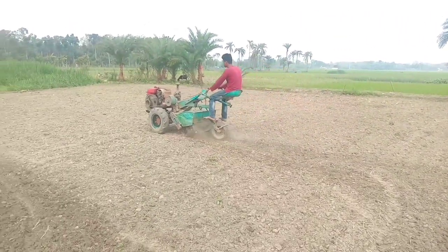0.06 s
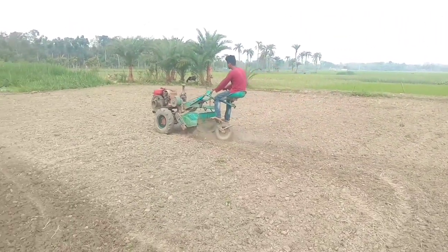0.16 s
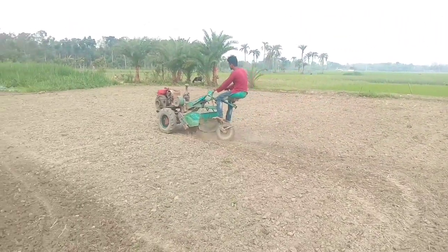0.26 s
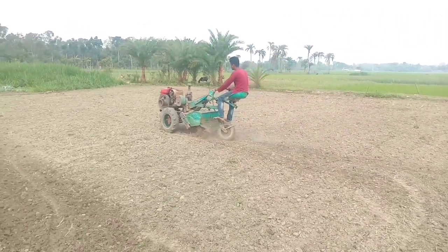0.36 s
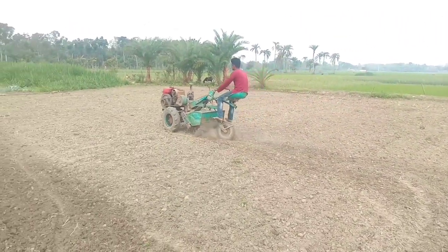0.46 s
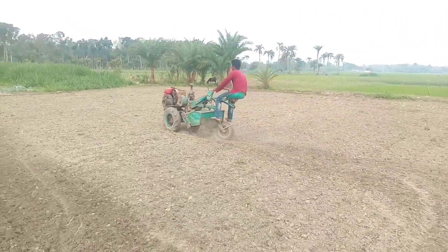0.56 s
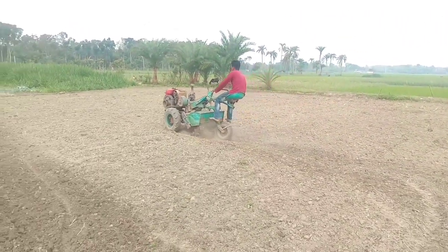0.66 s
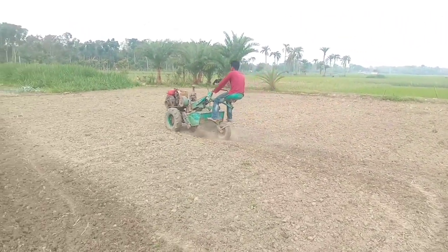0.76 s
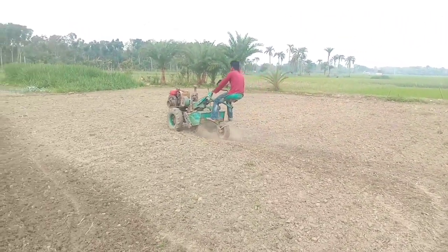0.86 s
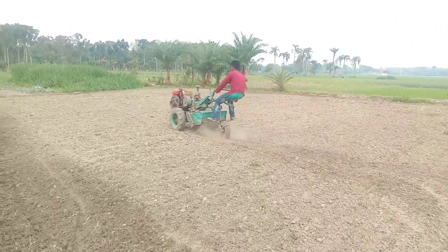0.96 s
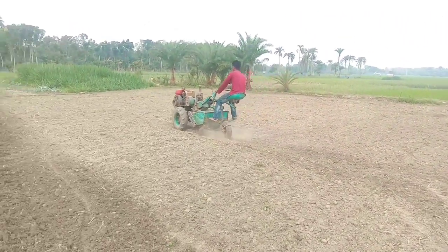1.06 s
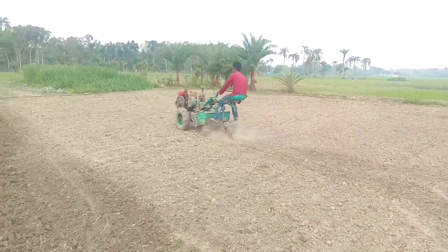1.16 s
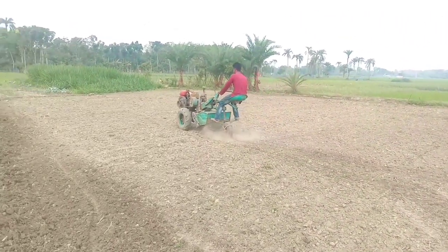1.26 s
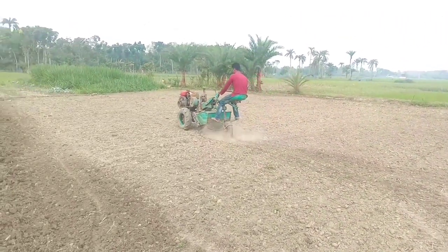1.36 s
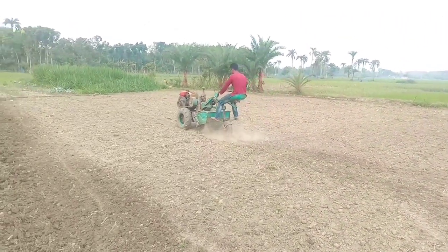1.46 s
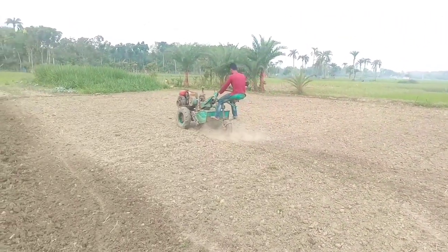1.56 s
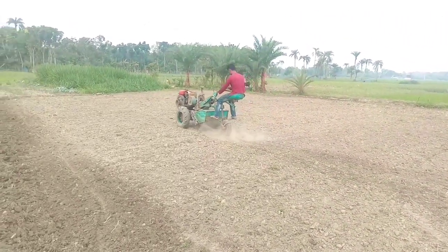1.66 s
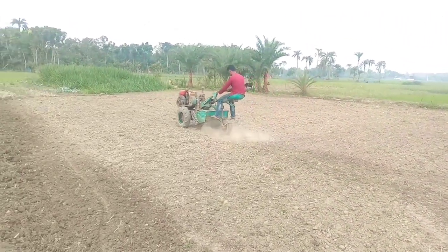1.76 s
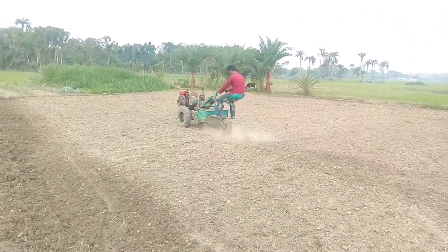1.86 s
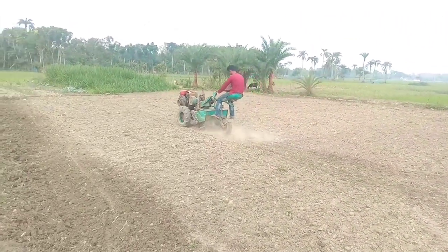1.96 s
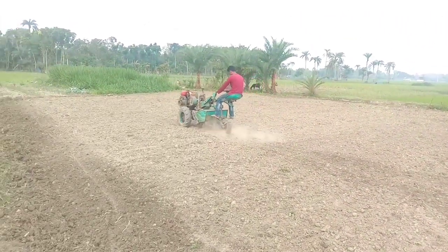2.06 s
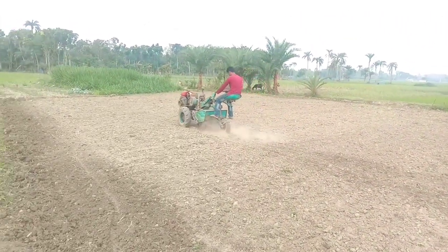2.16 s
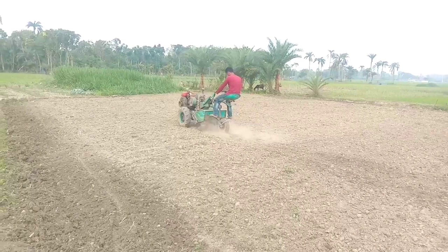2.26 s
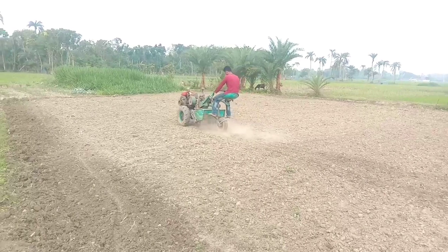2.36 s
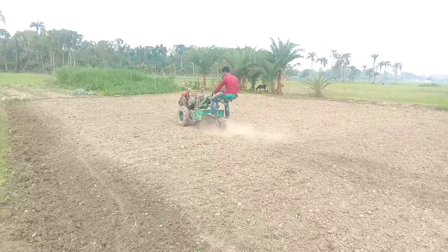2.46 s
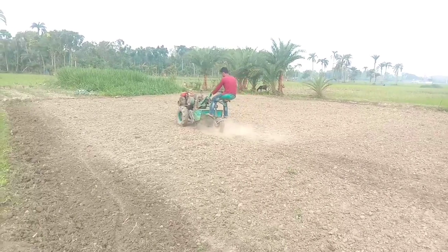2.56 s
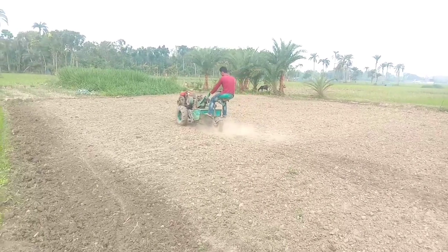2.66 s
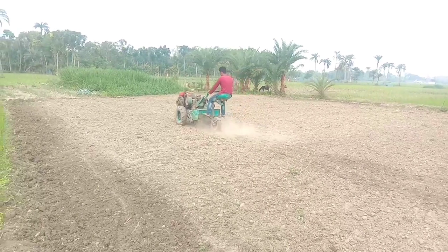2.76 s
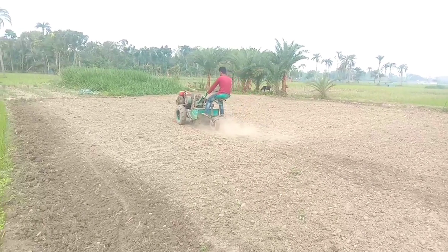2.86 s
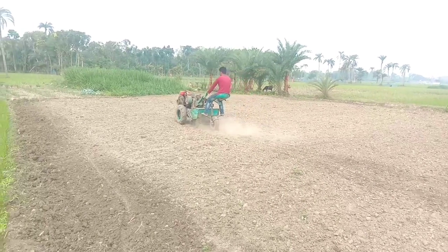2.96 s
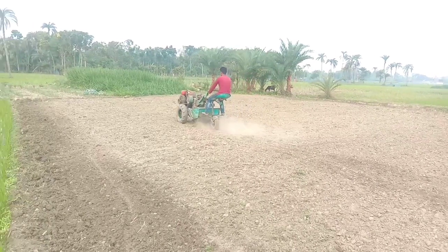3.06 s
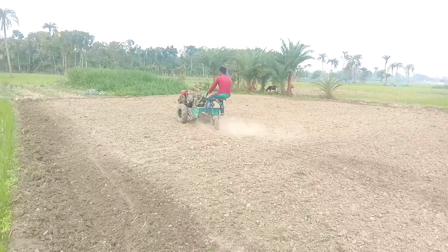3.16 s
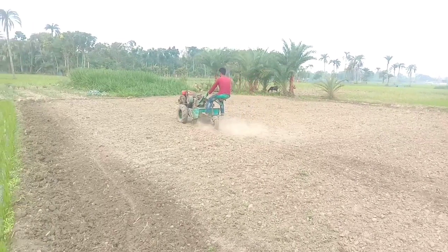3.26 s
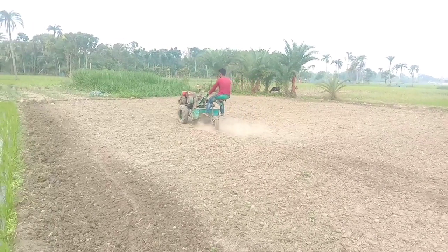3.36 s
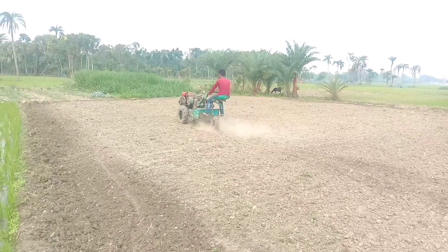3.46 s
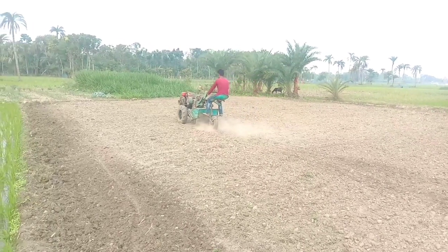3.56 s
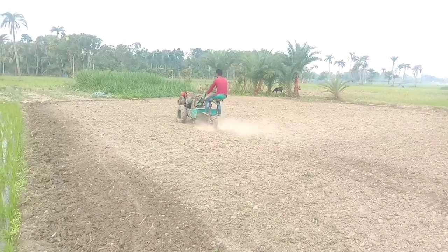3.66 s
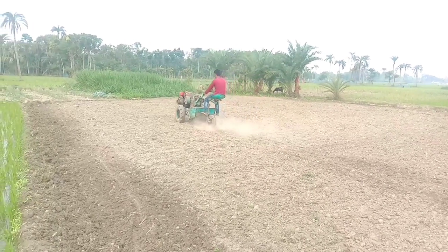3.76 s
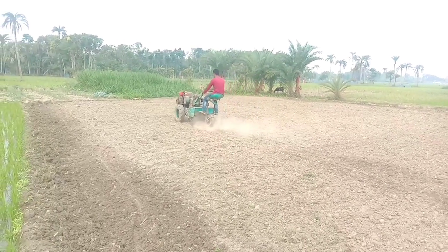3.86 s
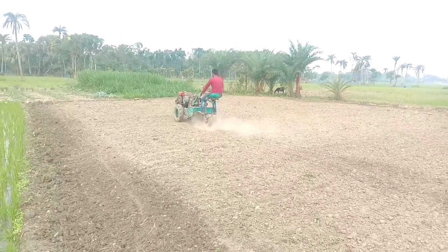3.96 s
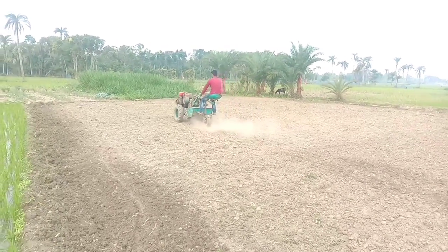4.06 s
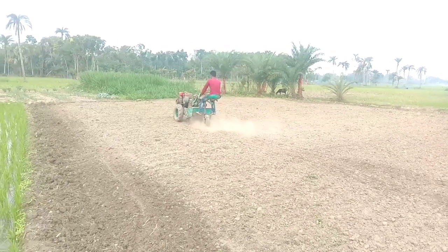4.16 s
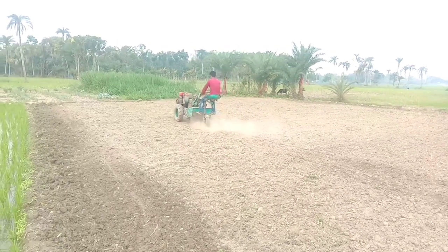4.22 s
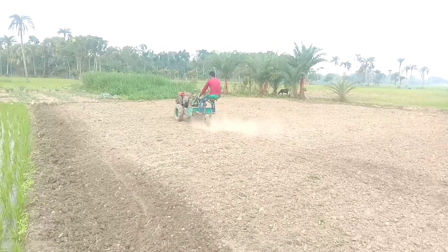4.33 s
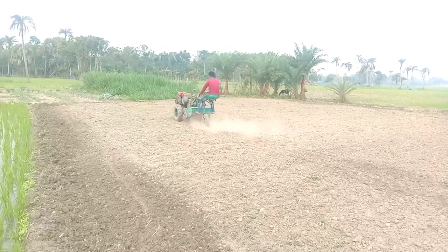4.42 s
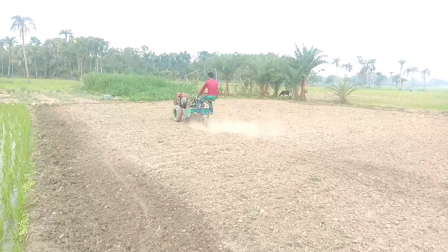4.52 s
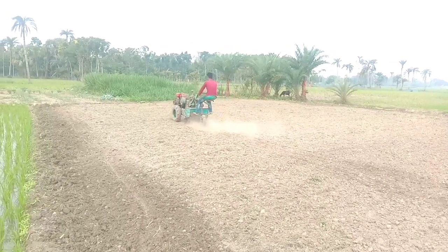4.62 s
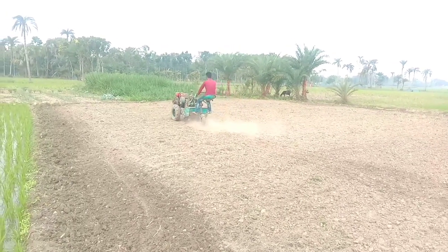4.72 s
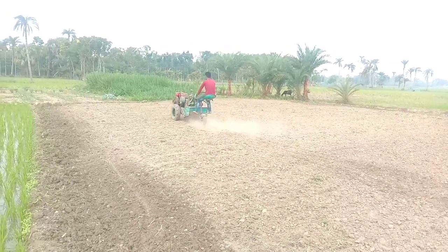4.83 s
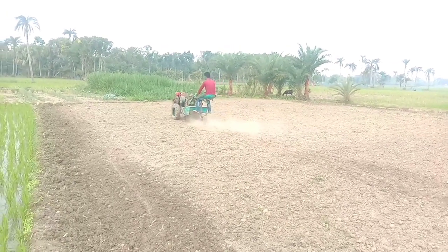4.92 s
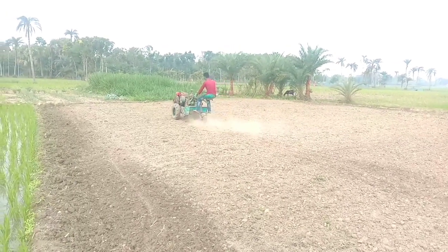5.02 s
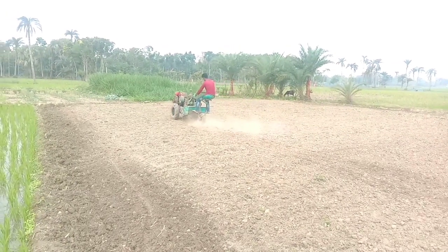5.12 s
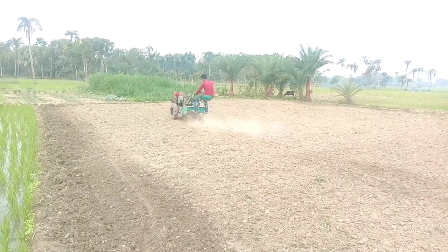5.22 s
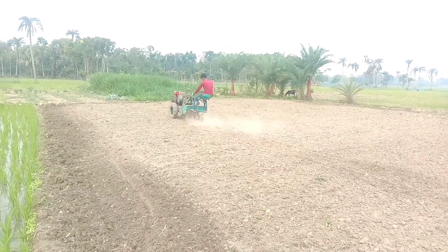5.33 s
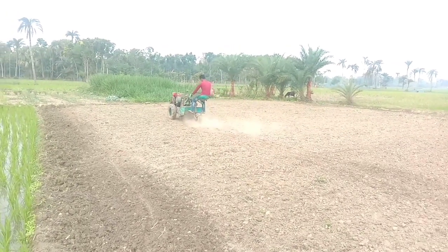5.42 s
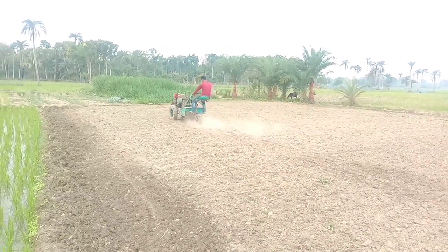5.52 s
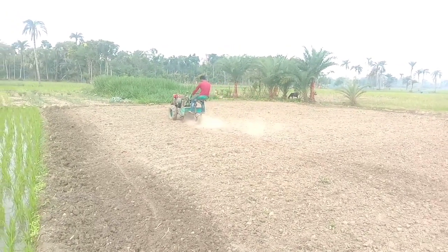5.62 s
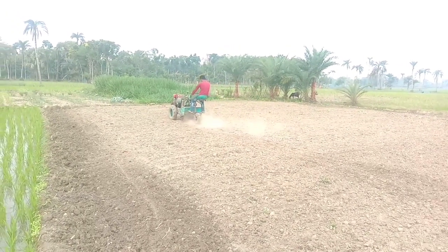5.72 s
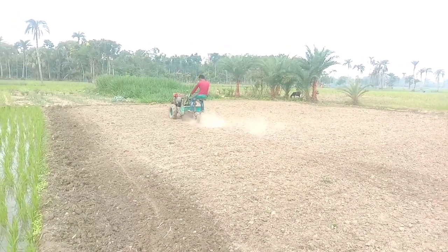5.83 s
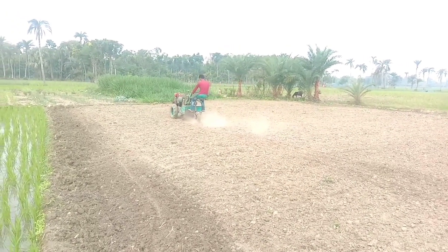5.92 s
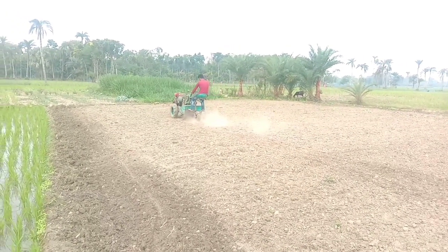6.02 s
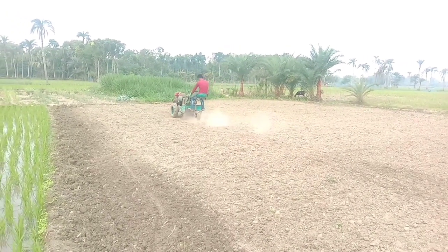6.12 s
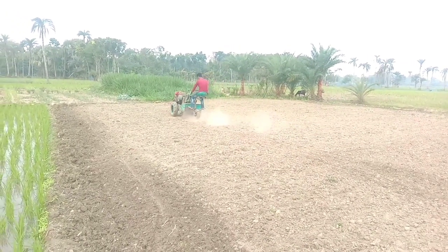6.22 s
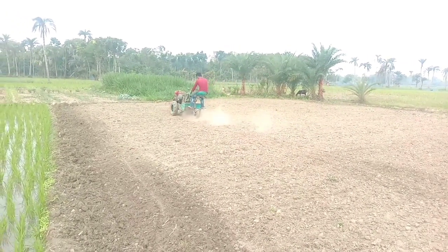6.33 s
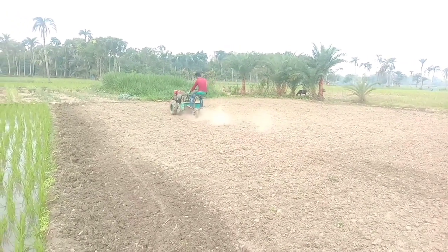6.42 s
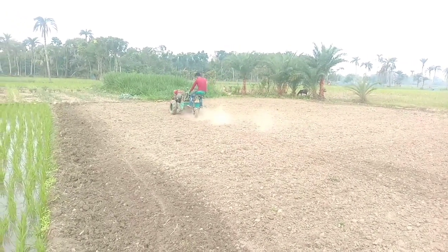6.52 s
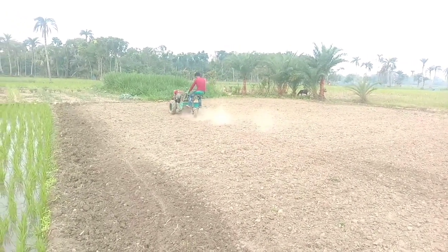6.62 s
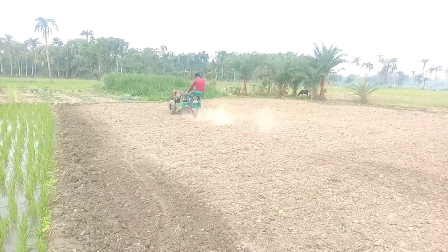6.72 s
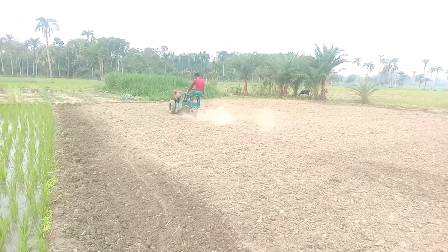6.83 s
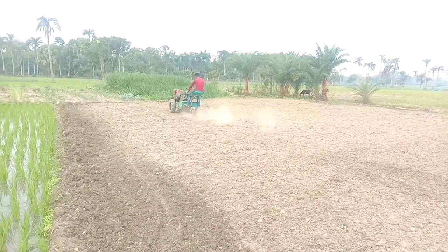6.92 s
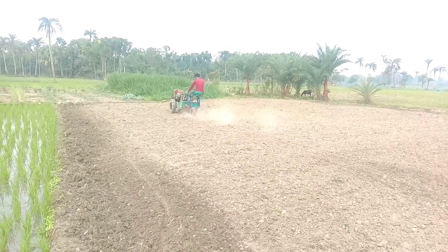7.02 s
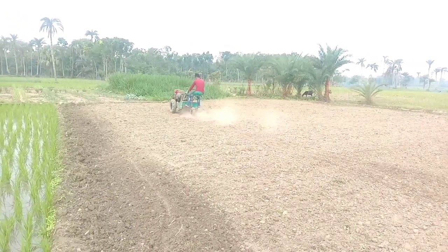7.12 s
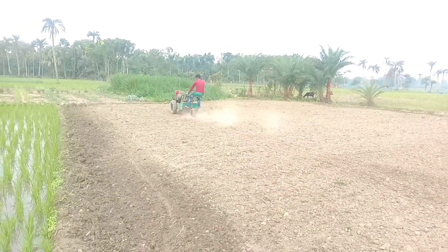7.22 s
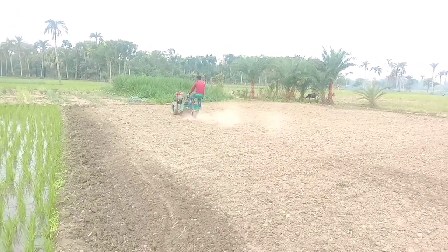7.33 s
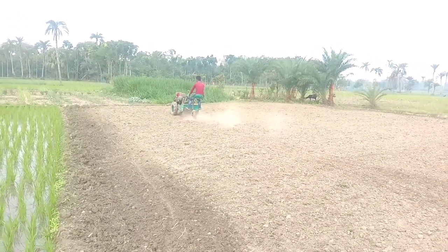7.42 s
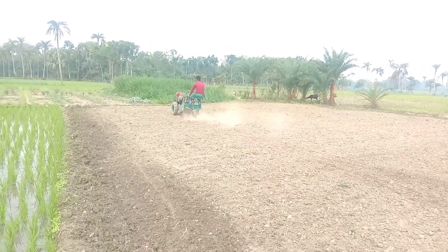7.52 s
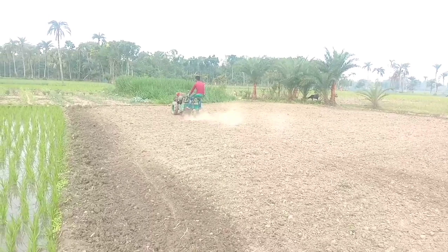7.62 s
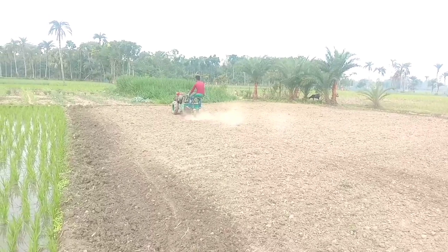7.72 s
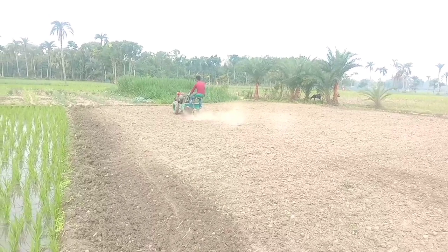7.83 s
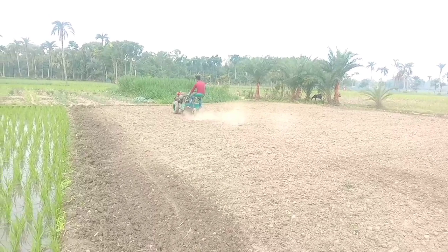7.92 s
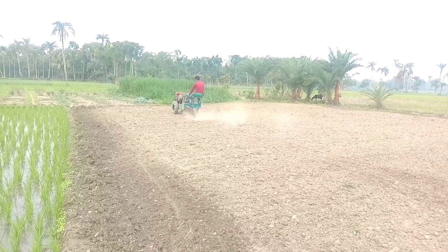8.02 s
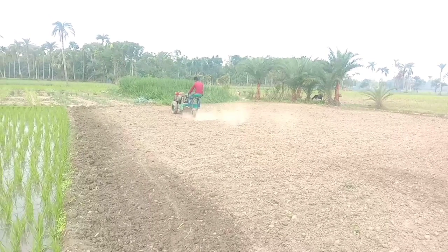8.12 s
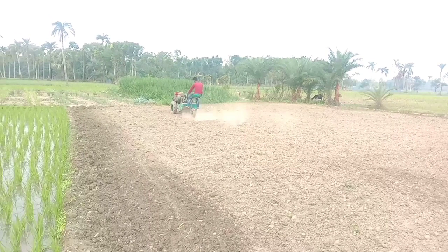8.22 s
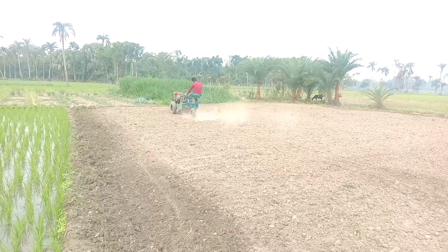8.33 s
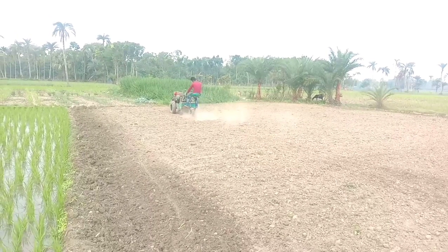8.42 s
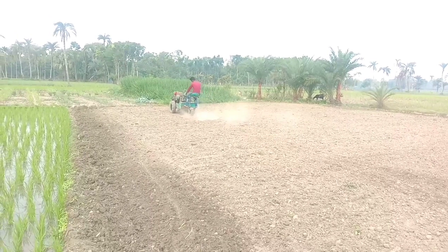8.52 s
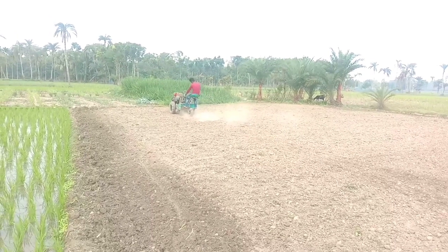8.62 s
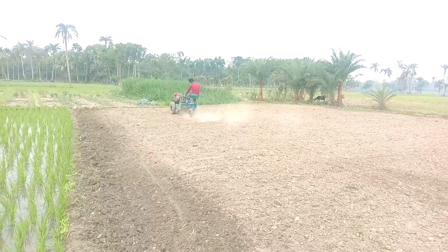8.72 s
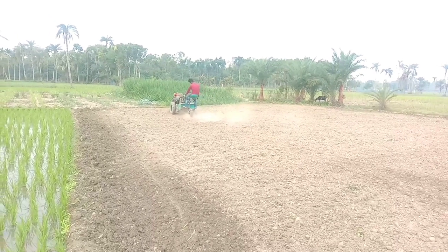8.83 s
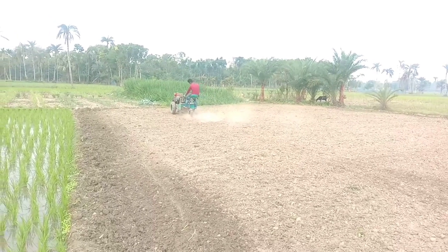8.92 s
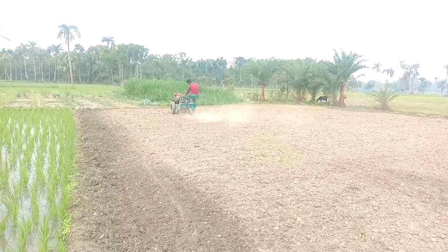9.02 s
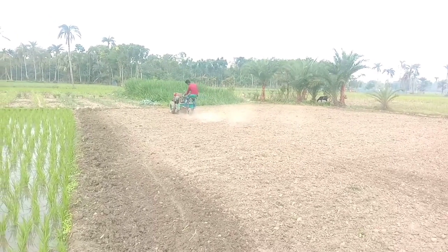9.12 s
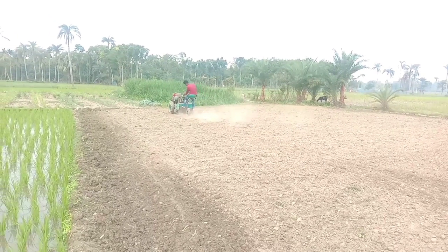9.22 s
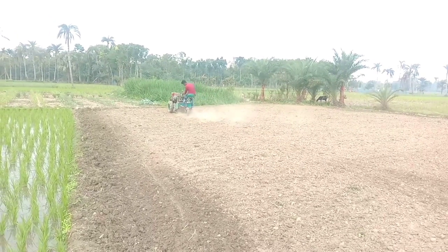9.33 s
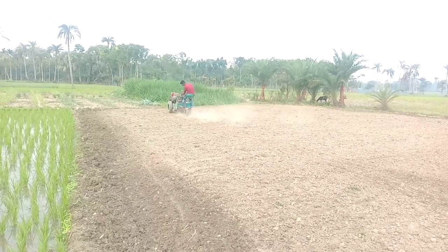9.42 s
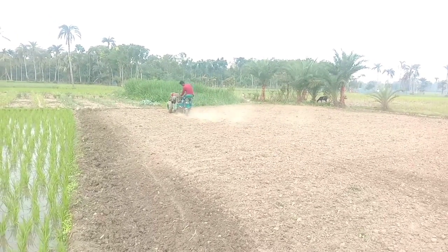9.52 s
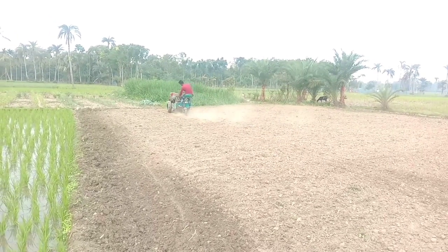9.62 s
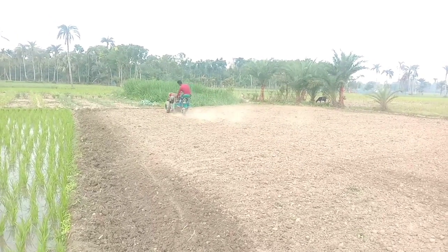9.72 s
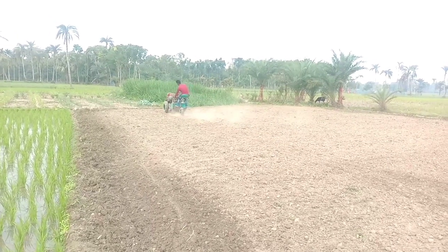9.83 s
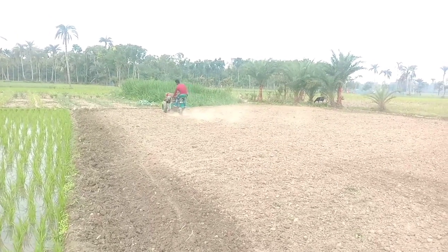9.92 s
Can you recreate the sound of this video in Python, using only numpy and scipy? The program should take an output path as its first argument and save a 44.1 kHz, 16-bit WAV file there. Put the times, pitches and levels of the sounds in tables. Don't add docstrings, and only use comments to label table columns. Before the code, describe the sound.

A single-cylinder diesel tiller thumps steadily at about fourteen beats a second, rattling and clanking over dry soil as it gradually drives away.

```python
import sys
import numpy as np
from scipy import signal
from scipy.io import wavfile
from scipy.ndimage import uniform_filter1d

SR = 44100
rng = np.random.default_rng(int(sys.argv[2]) if len(sys.argv) > 2 else 0)


def attenuation_scalar(level_db):
    decades = np.asarray(level_db, float) / 20
    return 10 ** decades


def inscribe(sig):
    pcm = np.round(np.clip(np.atleast_2d(sig).T, -1, 1) * 32767)
    wavfile.write(sys.argv[1], SR, pcm.astype(np.int16))


N = 440118

# time_s, heading (0 side on, 1 tail on, 2 phone turned, 3 far)
HEADING = [
    (0, 0),
    (2.2, 0.55),
    (3.9, 1),
    (5.5, 1.5),
    (5.6, 2),
    (6.8, 2),
    (8.3, 3),
    (10, 3),
]
# time_s, firings_per_s
SPEED = [(0, 13.98), (.8, 14.092), (2, 14.088), (3.6, 14.201), (4.8, 13.989), (6.8, 13.903), (8.8, 13.591),
         (10, 13.69)]
# start_s, thud_db, knock_hz, knock_above_thud_db, rattle_jolt_db
CLODS = [(0.566, -15, 315, -2, -1), (0.787, -20, 272, -11, -15), (0.971, -21, 460, 4, 3),
         (1.146, -25, 503, -9, 4.5), (1.489, -14, 272, -4, -3), (1.97, -24, 480, 0, -3),
         (2.056, -15, 540, 4, 0), (2.137, -17, 315, -13, -15), (2.438, -22, 530, 5, -1),
         (2.692, -16, 366, -8, 1), (2.727, -26, 300, -8, 4.5), (3.719, -28, 536, -5, -4),
         (4.359, -21, 307, -3, -3), (4.589, -9.5, 268, -15, 9), (4.609, -22, 272, -6, 3),
         (4.63, -25, 490, -5, -6), (6.403, -25, 310, -13, 5), (6.908, -26, 270, -10, -4),
         (7.424, -16, 490, -8, 4.5), (7.572, -24, 333, 8, 2), (7.63, -23, 272, -13, -6),
         (7.69, -24, 330, -7, -5), (8.132, -32, 323, -13, -11), (8.799, -19, 270, -14, 2), ]
SQUEAL_END_S = 1.15


def evened(x):
    return x / np.sqrt(np.mean(x ** 2) + 1e-20)


def along(rows, t):
    s, *columns = np.transpose(rows)
    return [np.interp(t, s, c) for c in columns]


def add(mix, s, sound):
    part = mix[max(round(s * SR), 0):][:len(sound)]
    part += sound[:len(part)]


def ring(hz, width, rise):
    t = np.arange(int(SR * min(.2, 3 / width))) / SR
    return np.sin(2 * np.pi * hz * t) * np.exp(-np.pi * width * t) * (1 - np.exp(-t / rise))


def filtered(x, order, hz, kind):
    return signal.sosfilt(signal.butter(order, hz, kind, fs=SR, output="sos"), x)


def smooth(x, bands, frames):
    return uniform_filter1d(uniform_filter1d(x, size=bands, axis=0), size=frames, axis=1)


def crank():
    start_cycles = -1.129
    s = np.arange(-SR // 2, N + SR // 2) / SR
    turns = np.cumsum(along(SPEED, s)[0]) / SR
    return s, turns - turns[SR // 2] + start_cycles


def loudness(part, t):
    near_m = 10
    # time_s, distance_m
    distance = [(0, 9.4), (1, 11.7), (2, 12.85), (3.3, 16.3), (4.3, 17.8), (5.1, 19), (5.8, 19.4),
                (7.2, 22.7), (8.0, 22.8), (8.9, 29.3), (9.98, 27.7)]
    facing = {"exhaust": (-24, -23.5, -23.7, -23), "churn": (-33.5, -32, -33.5, -28.5),
              "casing": (-25.5, -24.5, -24.5, -24.5), "gears": (-37, -35.5, -37, -37),
              "valves": (-49.5, -49, -49.5, -47.5), "hiss": (-55.5, -54.5, -54.5, -56)}
    heading, = along(HEADING, t)
    return attenuation_scalar(np.interp(heading, range(4), facing[part])) * near_m / along(distance, t)[0]


def exhaust(t, uneven_db=.9, tail_db=1.2, detune=.011, jitter=.004):
    # place_0_to_1, ring_hz, width_hz, level_db
    kicks = [
        (-.062, 214, 134, -14),
        (-.005, 60, 92, 0),
        (.288, 60, 92, -15),
        (.306, 107, 5, -28),
        (.451, 62, 139, -18),
        (.755, 94, 9, -22),
    ]
    early_s = .5
    out = np.zeros(N + SR)
    s, count = np.array(crank())[:, ::441]
    chance = rng.standard_normal((143, len(kicks), 2))
    for firing, luck in zip(range(-3, 140), chance):
        for (place, hz, width, db), (strong, sharp) in zip(kicks, luck):
            start = np.interp(firing + place + jitter * luck[0, 1], count, s) + early_s
            spread_db = uneven_db if db == 0 else tail_db
            kick = ring(hz * (1 + detune * sharp), width, .005)
            add(out, start, -attenuation_scalar(db + spread_db * strong) * kick)
    out = filtered(out, 4, 106, "high")
    out = filtered(out, 2, 54, "high")
    revs_db = 3 * (along(SPEED, t)[0] - 14)
    return loudness("exhaust", t) * attenuation_scalar(revs_db) * evened(out[SR // 2:][:N])


def jolts():
    power, t = np.zeros(N), np.arange(SR // 8) / SR
    for s, *_, jolt_db in CLODS:
        add(power, s, attenuation_scalar(2 * jolt_db) * np.exp(-t / 0.015) * np.minimum(t / 0.0031, 1))
    return power


def beat(turns, part, length, uneven_db=3.0, jolt_db=0):
    # place_0_to_1, casing_db, gears_db, valves_db, hiss_db
    blows = [
        (-.12, -2.5, -8, -10, -6),
        (-.035, -4, 7, 5, 2),
        (.19, -4, 2.5, 1, 0),
        (.28, -17, -1.5, 0, -2),
        (.55, -14, 0.5, 1.5, 4.5),
        (.74, -2.5, 0, -2, 0),
    ]
    power = 1 + attenuation_scalar(2 * jolt_db) * jolts()[::8]
    turns = turns[::8]
    for row in blows:
        since = turns - row[0] + 3
        luck = attenuation_scalar(uneven_db * rng.standard_normal(150))[since.astype(int)]
        rise = np.minimum(since % 1 / 0.02, 1)
        power += luck * attenuation_scalar(2 * row[part]) * np.exp(-(since % 1) / length) * rise
    return np.repeat(np.sqrt(power), 8)[:N]


def rattle(colours, level, part, grit_db, patchy_db, streaks_db=0.0):
    edges_hz = [200, 2400, 5800, 9300, 15600]
    grit = attenuation_scalar(grit_db * np.minimum(rng.exponential(1, N), 6)) * (rng.random(N) < 2500 / SR)
    grit = evened(grit * rng.choice([-1., 1.], N))
    drive = (grit + rng.standard_normal(N)) * level
    hz, t, z = signal.stft(drive, SR, nperseg=1024, noverlap=768)

    heading, = along(HEADING, t)
    inside = (hz >= edges_hz[part - 1]) & (hz < edges_hz[part])
    log_gain = 0
    for k, colour in enumerate(colours):
        f, db = np.transpose(colour)
        shape = attenuation_scalar(np.interp(np.log(hz + 1), np.log(f), db)) * inside + 1e-6
        share = np.clip(1 - abs(np.clip(heading, 0, 3) - k), 0, 1)
        log_gain = log_gain + np.log(evened(shape))[:, None] * share

    patches = evened(smooth(rng.standard_normal(z.shape), 10, 16))
    streaks = evened(smooth(rng.standard_normal((513, len(t) // 16 + 1)), 3, 8))
    streaks = uniform_filter1d(np.repeat(streaks, 16, axis=1), size=16, axis=1)[:, :len(t)]
    z = z * np.exp(log_gain) * attenuation_scalar(patchy_db * patches + streaks_db * streaks)
    return evened(signal.istft(z, SR, nperseg=1024, noverlap=768)[1][:N])


def sheets(modes, level, per_s):
    knocks = rng.standard_normal(N) * (rng.random(N) < per_s / SR) * level
    out = np.zeros(N)
    for hz, width, db in modes:
        out += attenuation_scalar(db) * evened(signal.oaconvolve(knocks, ring(hz, width, 0.0013))[:N])
    return out


def casing_rattle(t, turns):
    # pitch_hz, density_db (per Hz)
    casing_colours = [
        [(140, -28), (240, -1), (285, -5), (499, -3), (647, -9), (785, -23), (898, -6.5), (1060, -2), (1220, -4.5), (1360, -7.5), (2100, -5), (2400, -23), (3120, -49), (5280, -120)],
        [(140, -21), (240, -4), (416, -12), (499, -6.5), (654, -12), (777, -31.5), (925, -6.5), (1230, -1), (1350, -7), (1650, -9), (1780, -12), (2400, -17), (3120, -43), (5280, -120)],
        [(140, -32), (240, -9), (308, -1.5), (367, -14.5), (499, -7.5), (785, -22), (916, -8.5), (1210, 0.5), (1320, -7), (1500, -4), (1980, -9), (2400, -24.5), (3120, -52), (5280, -120)],
        [(140, -42), (240, -35), (300, -3), (408, -28), (480, -12.5), (641, -13), (777, -40), (907, -9), (1250, -1.5), (1450, -7), (1960, -7), (2400, -22.5), (3120, -56), (5280, -120)],
    ]
    # pitch_hz, width_hz, level_db
    panels = [(1240, 22, -8), (499.7, 31, -18.5), (1085, 22, -13.5), (1564, 38, -13.5)]
    level = beat(turns, part=1, length=0.14)
    noise = rattle(casing_colours, level, part=1, grit_db=1.5, patchy_db=1.0, streaks_db=0.76)
    return loudness("casing", t) * (noise + sheets(panels, level, per_s=300))


def gear_rattle(t, turns):
    # pitch_hz, density_db (per Hz)
    gear_colours = [
        [(1410, -21), (2400, -3), (2770, -3.5), (2920, -8), (3280, -4.5), (3560, -16.5), (4080, -8), (4280, -0.5), (4750, -18), (4860, -16), (5150, -11), (5800, -10), (7540, -44), (12800, -120)],
        [(1410, -36), (2400, -5), (2820, -1), (3220, -3.5), (3500, -12.5), (3890, -3), (4240, -5), (4600, -18), (5060, -3), (5330, -8.5), (5690, -27), (5800, -24), (7540, -49), (12800, -120)],
        [(1410, -36), (2400, 0), (2870, 0), (3270, 1), (3560, -8), (3660, -3), (3880, 6), (4650, -9), (4840, -2), (5130, 6), (5430, -8), (5800, -3), (7540, -41), (12800, -120)],
        [(1410, -42), (2400, -2.5), (3000, -9), (3260, -6), (3470, -18.5), (3840, 2.5), (4070, 6.5), (4550, -9), (5000, 3), (5170, 2.5), (5410, -3), (5800, -16), (7540, -46), (12800, -120)],
    ]
    # pitch_hz, width_hz, level_db
    guards = [(5050, 69, -14), (2810, 41, -16.5), (3798, 51, -12), (4034, 99, -9.5)]
    level = beat(turns, part=2, length=0.081)
    noise = rattle(gear_colours, level, part=2, grit_db=2.0, patchy_db=1.33, streaks_db=1.5)
    return loudness("gears", t) * (noise + sheets(guards, level, per_s=320))


def valve_seat(turns, place=0.5, hz=7250, uneven_db=4.5):
    shuts = np.diff(np.floor(turns - place), prepend=np.floor(turns[0] - place))
    luck = attenuation_scalar(uneven_db * rng.standard_normal(150))[(turns - place + 3).astype(int)]
    return evened(signal.oaconvolve(shuts * luck, ring(hz, 90, .0006))[:N])


def valve_rattle(t, turns):
    # pitch_hz, density_db (per Hz)
    valve_colours = [
        [(3410, -31), (5800, -7), (6290, 3.5), (6690, -13), (6930, -4), (7170, -3), (7710, -10.5), (9300, -13), (12100, -43), (20500, -120)],
        [(3410, -35), (5800, -11), (5950, 1.5), (6230, 3), (6360, -3.5), (6590, -28), (6790, -13), (7400, -4), (7970, -12), (8750, -6), (9300, -14), (12100, -44), (20500, -120)],
        [(3410, -31), (5800, -9), (6290, 8), (6520, -9), (6630, -30), (6790, -15), (7370, -8), (8310, -9), (8640, -5), (9080, -21), (9300, -19), (12100, -49), (20500, -120)],
        [(3410, -37), (5800, -7), (5970, -8), (6190, 5), (6480, 4.5), (6650, -18), (6790, -16), (7210, -2), (7740, -15), (8760, -4.5), (9300, -36), (12100, -54), (20500, -120)],
    ]
    level = beat(turns, part=3, length=0.06, jolt_db=-4)
    noise = rattle(valve_colours, level, part=3, grit_db=-0.5, patchy_db=1.5, streaks_db=2.0)
    return loudness("valves", t) * (noise + attenuation_scalar(-17.5) * valve_seat(turns))


def screen(t):
    from_s, close_s, until_s, open_s, screen_db = 3.2, 0.91, 5.65, .15, -5.5
    slip_db = 2
    hidden = np.clip(np.minimum((t - from_s) / close_s, (until_s - t) / open_s), 0, 1)
    return attenuation_scalar(screen_db * hidden + slip_db * np.clip((SQUEAL_END_S - t) / .6, 0, 1))


def engine_hiss(t, turns):
    # pitch_hz, density_db (per Hz)
    hiss_colours = [
        [(5470, -33), (9300, -11), (10400, -2), (11300, 0), (11700, -3), (12000, -7), (12400, -5), (13000, -16), (14400, -9), (15100, 2), (15500, -10)],
        [(5470, -31), (9300, -4), (9890, -4), (10400, -14), (10900, -2), (11400, -5.5), (12200, -13), (12600, -17), (13100, -18), (14900, -7), (15500, -12)],
        [(5470, -41), (9300, -14), (9690, -1), (10200, 0), (11100, -5), (12300, -4), (13500, -13), (14000, -19), (14700, -11), (15500, -11)],
        [(5470, -43), (9300, -11), (9500, -14), (9810, -3), (10500, 1.5), (11400, -5), (11900, -3), (12500, 0), (13800, -14), (14800, -7), (15500, -9)],
    ]
    level = beat(turns, part=4, length=.05, uneven_db=5.0, jolt_db=-6)
    noise = rattle(hiss_colours, level, part=4, grit_db=1.5, patchy_db=1.9, streaks_db=2.0)
    return loudness("hiss", t) * screen(t) * noise


def rumble(t, turns, low_hz=135, high_hz=260):
    # middle_s, half_width_s, boost_db
    hard = [(.57, 0.053, 5.5), (1.03, 0.049, 8.5), (1.45, 0.049, 5), (1.75, 0.092, 5), (2.12, 0.082, 10.5),
            (2.47, 0.043, 7), (2.722, .05, 6), (3.81, 0.05, 9.5), (4.1, .05, 6), (4.383, 0.043, 9),
            (4.61, .04, 5), (6.14, 0.058, 5), (7.434, 0.025, 10), (7.65, 0.079, 12.5), (7.86, 0.081, 4.5),
            (8.89, 0.12, 5)]
    lumps = rng.standard_normal(N) * (rng.random(N) < 700 / SR)
    lumps *= 1.2 + np.exp(-((turns + .15) % 1) / .2)
    soil = filtered(lumps, 3, [low_hz, high_hz], "band")
    frame = signal.oaconvolve(lumps, ring(193.7, 17, 0.0058))[:N]
    hard_db = sum(db * np.clip(1 - abs(t - s) / (2 * half), 0, 1) for s, half, db in hard)
    return loudness("churn", t) * attenuation_scalar(hard_db - 4.5) * (evened(soil) + attenuation_scalar(-3) * evened(frame))


def struck(rows, width, bounce_s, spread, gain_db, count=4):
    out = np.zeros(N)
    for (s, db, hz), luck in zip(rows, rng.uniform(-1.013, 1, (len(rows), count, 2))):
        for k, (late, sharp) in enumerate(luck):
            at = s - .001 + bounce_s * (k + .5 * late * (k > 0))
            tone = ring(hz * (1 + spread * sharp * (k > 0)), width, .5 / hz)
            add(out, at, attenuation_scalar(db + gain_db - 4.1 * k) * tone)
    return out


def loose_metal():
    # start_s, peak_db, pitch_hz
    bangs = [(0.3077, -17, 1070), (0.388, -23, 1080), (0.5222, -15, 1110), (0.6404, -12.5, 1035),
             (0.7487, -14, 1090), (0.7831, -13, 1080), (0.8505, -18, 1050), (0.9737, -9, 1240),
             (1.1543, -9, 1220), (1.264, -15, 1060), (1.4586, -19, 1260), (1.498, -16, 1240),
             (1.8442, -12, 1230), (1.928, -18, 1160), (1.9674, -14, 1240), (2.0213, -19, 1220),
             (2.0622, -18, 1240), (2.1415, -25, 1160), (2.3461, -13, 1240), (2.4164, -13, 1240),
             (2.4848, -22, 1030), (2.5406, -15, 1240), (2.5795, -18, 1250), (2.6519, -14, 1220),
             (2.831, -16, 1120), (2.8769, -18, 1180), (2.9113, -14, 1240), (2.9542, -15.5, 1220),
             (3.0899, -13.5, 1120), (3.1413, -17, 1210), (3.1901, -19, 1245), (3.253, -18, 1060),
             (3.3682, -13, 1230), (3.4022, -18, 1250), (3.7204, -17, 1220), (3.9, -23, 1230),
             (4.1076, -19, 1250), (4.3216, -17, 1240), (4.4618, -21, 1210), (4.5296, -26, 1100),
             (4.594, -21, 1040), (4.793, -19, 1100), (4.8599, -17.5, 1240), (5.0699, -15, 1280),
             (5.1761, -19, 1240), (5.3223, -20, 1230), (5.6775, -14, 1240), (5.7593, -20, 1440),
             (5.8282, -16, 1230), (5.9988, -24, 1250), (6.9022, -19, 1150), (7.1581, -20, 1470),
             (7.1881, -21, 1250), (7.6969, -24, 1230), (7.7648, -20, 1090), (7.8745, -20, 1210),
             (8.1324, -14.5, 1240), (8.2232, -26, 1240), (8.5016, -20, 1230), (9.394, -18, 1250)]
    # start_s, peak_db, pitch_hz
    clatter = [(0.0207, -18.5, 3800), (0.0648, -28, 2570), (0.2942, -20, 4170), (0.3177, -26, 4160),
               (0.345, -20, 2840), (0.4379, -29, 4100), (0.4778, -23, 2720), (0.5082, -34, 2870),
               (0.8485, -29, 2510), (0.8829, -19, 2610), (1.0894, -25, 2840), (1.1478, -24, 3110),
               (1.1644, -21, 2830), (1.2989, -26, 2490), (1.4726, -22, 2840), (1.5728, -27, 3960),
               (1.9714, -27, 2690), (2.0258, -21, 2640), (2.0702, -25, 4060), (2.2189, -27, 3830),
               (2.2653, -26, 2930), (2.3555, -27, 3180), (2.6873, -24, 2880), (2.7194, -21, 2880),
               (2.8474, -27, 3000), (2.9906, -31, 3890), (3.046, -32, 3990), (3.1263, -41, 3870),
               (3.693, -26, 3960), (3.71, -22, 2850), (3.7673, -28, 3880), (3.9619, -29, 2860),
               (4.5461, -30, 3860), (4.592, -26, 3920), (5.2794, -23, 2840), (5.3313, -24, 3900),
               (5.4745, -30, 4010), (5.9194, -26, 2840), (6.554, -38, 4170), (6.6682, -38, 3920),
               (6.9122, -32, 3820), (7.234, -33, 3870), (7.788, -29, 4140), (8.0721, -37, 4000),
               (8.9206, -28, 3970), (9.0164, -27, 4000), (9.4654, -33, 4190)]
    # start_s, peak_db, pitch_hz
    stones = [(0.132, -19, 334), (0.359, -19, 342), (0.485, -17, 409), (0.561, -12, 231), (0.638, -23, 231),
              (0.785, -18, 234), (0.964, -16, 473), (1.038, -17, 253), (1.354, -23, 242), (1.429, -24, 230),
              (1.679, -25, 487), (1.769, -18, 245), (1.829, -16, 313), (1.923, -30, 231), (1.971, -18, 482),
              (2.054, -22, 234), (2.137, -27, 231), (2.441, -24, 528), (2.619, -31, 326), (2.691, -19, 237),
              (2.835, -26, 231), (3.08, -25, 231), (3.54, -30, 231), (3.678, -19, 328), (4.115, -26, 231),
              (4.164, -28, 248), (4.356, -16, 231), (4.424, -28, 231), (4.589, -18, 237), (5.042, -28, 242),
              (5.642, -25, 250), (5.9, -26, 297), (6.281, -22, 263), (7.41, -29, 231), (7.575, -24, 248),
              (7.919, -22, 234)]
    panel = struck(bangs, 59, .006, 0.068, gain_db=-4.5)
    guard = struck(clatter, 118, .004, 0.1, gain_db=-3)
    frame = struck(stones, 49, .009, 0.12, gain_db=-5.5)
    return panel + guard + frame


def clods():
    # start_s, peak_db, pitch_hz
    pin = [(5.6326, -34, 3170), (5.7778, -42, 3200), (6.4063, -39, 3180), (7.7573, -43, 3200),
           (8.8079, -42, 3140)]
    out = np.zeros(N)
    for s, db, hz, knock_db, _ in CLODS:
        add(out, s, -attenuation_scalar(db - 3.0) * ring(202, 54, 0.001))
        add(out, s, attenuation_scalar(db + knock_db - 5.5) * ring(hz, 40, 0.0015))
    for s, db, hz in pin:
        add(out, s, attenuation_scalar(db + 3.5) * ring(hz, 30, .002))
    return filtered(out, 2, 90, "high")


def plate(bounce_s=0.0059, bounce_db=-5, spread=0.031):
    # start_s, peak_db, low_ring_db, middle_ring_db
    clinks = [(0.2399, -27.5, 6, 0), (0.6205, -29, 5, -4), (0.6714, -34, -1, -7), (0.9537, -23, 2, -4),
              (0.989, -25.5, 7, 0), (1.6965, -22, -2, -10), (1.8138, -24, 2, -19), (1.8791, -24.5, 5, -12),
              (2.4394, -21.5, 1, -6), (2.654, -25.5, 3, -1), (3.5533, -38, -5, -2), (4.1654, -32, 9, -2),
              (4.4747, -29, -11, -9), (4.9945, -26, 2, -3), (5.0464, -33, -9, -8), (5.1557, -44, -3, -9),
              (5.5847, -36, -13, -10), (6.135, -31, -2, -1), (6.1739, -31, -1, -5), (6.5206, -32, -14, -11),
              (6.7121, -22.5, -6, -6), (6.7805, -30, -4, -7), (6.8176, -25, -6, -2), (7.5028, -36, -19, 2),
              (7.5403, -26, -1, -2), (8.7849, -25, -21, -6), (8.8209, -21.5, -15, -8),
              (9.1476, -44, -19, -9)]
    # pitch_hz, t60_s
    plate_rings = [(5046, 0.039), (2820, 0.035), (3770, 0.072)]
    out = np.zeros(N)
    for (s, db, *others), luck in zip(clinks, rng.uniform(-1, 1, (len(clinks), 3, 3))):
        for (hz, t60), rel_db, sharps in zip(plate_rings, [0, *others], luck):
            width = np.log(1000) / np.pi / t60
            for k, sharp in enumerate(sharps):
                tone = ring(hz * (1 + spread * sharp * (k > 0)), width, rise=0.00039)
                at = s + k * bounce_s * (1 + .3 * luck[0, k])
                add(out, at, attenuation_scalar(db + rel_db - 4.5 + k * bounce_db) * tone)
    return out


def squeal(t, hz=10170, width_hz=500):
    top_db, top_s, swell_db_per_s, grip_db_per_s = -51, 0.37, 28, 22
    db = top_db - np.maximum(swell_db_per_s * (top_s - t), grip_db_per_s * (t - top_s))
    fuzz = filtered(rng.standard_normal(N), 2, width_hz / 2, "low")
    fade = np.clip((SQUEAL_END_S - t) / 0.4, 0, 1)
    return attenuation_scalar(db) * fade * evened(fuzz * np.sin(2 * np.pi * hz * t))


def breeze(low_hz=22, top_hz=80):
    return attenuation_scalar(-57) * evened(filtered(rng.standard_normal(N), 2, [low_hz, top_hz], "band"))


def scene():
    t = np.arange(N) / SR
    turns = crank()[1][SR // 2:][:N]
    mix = exhaust(t) + rumble(t, turns)
    mix += casing_rattle(t, turns) + gear_rattle(t, turns)
    mix += valve_rattle(t, turns) + engine_hiss(t, turns)
    mix += loose_metal() + clods() + plate() + squeal(t) + breeze()
    return mix[None]


def low_pass(x):
    return signal.sosfilt(signal.butter(12, 16720, fs=SR, output="sos"), x)


def record(dry):
    top_cut = signal.firwin(511, 15510, window=("kaiser", 9), fs=SR)
    mix = signal.oaconvolve(dry, top_cut[None], "same")
    return low_pass(mix)


dry = scene()
out = record(dry)
inscribe(out)
```